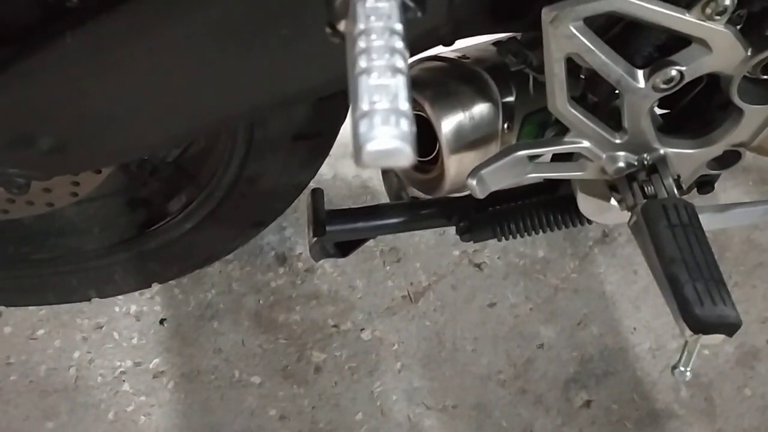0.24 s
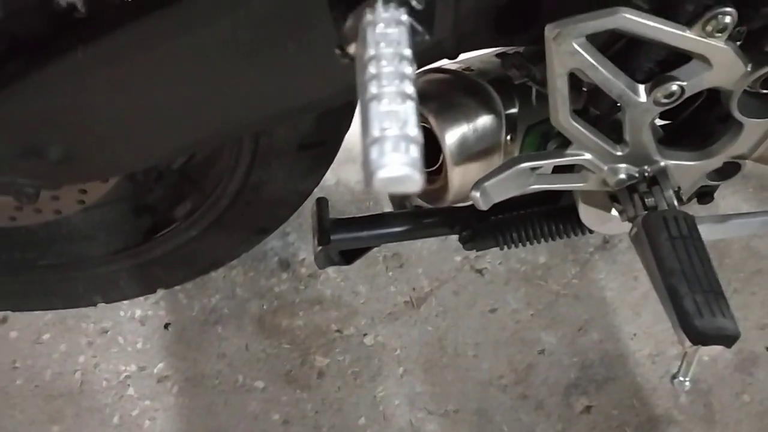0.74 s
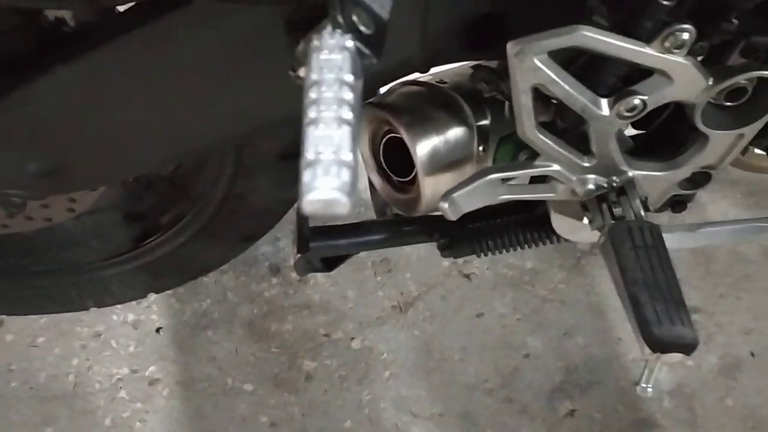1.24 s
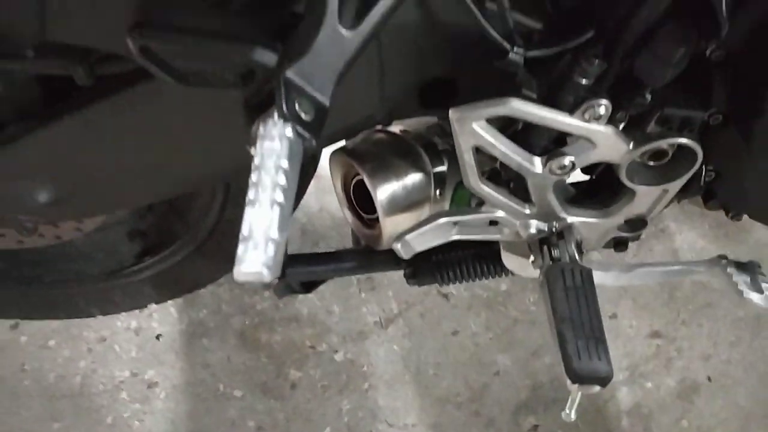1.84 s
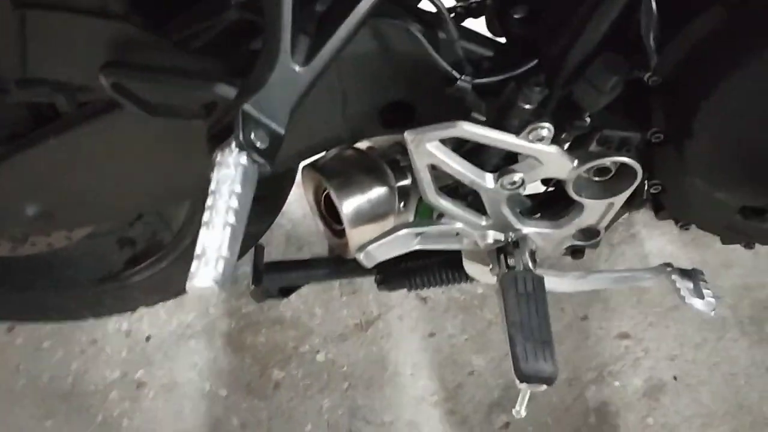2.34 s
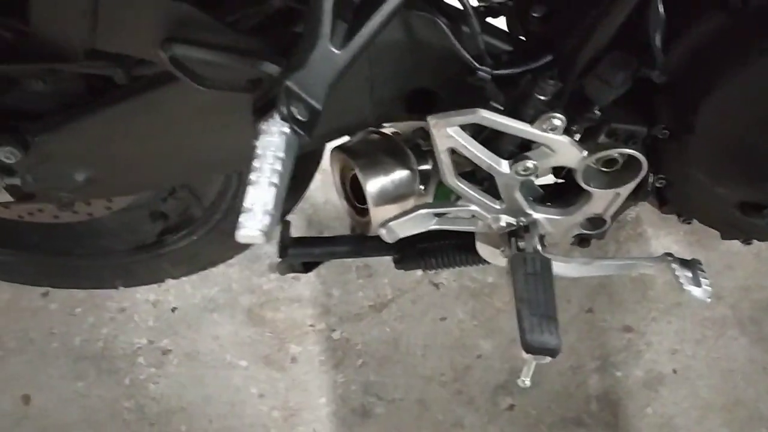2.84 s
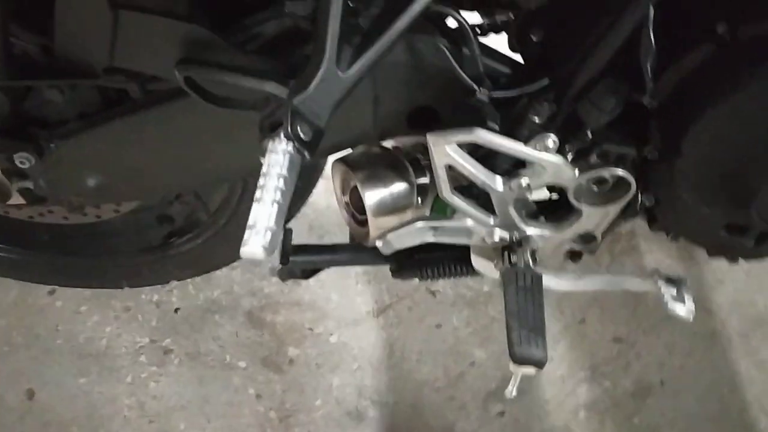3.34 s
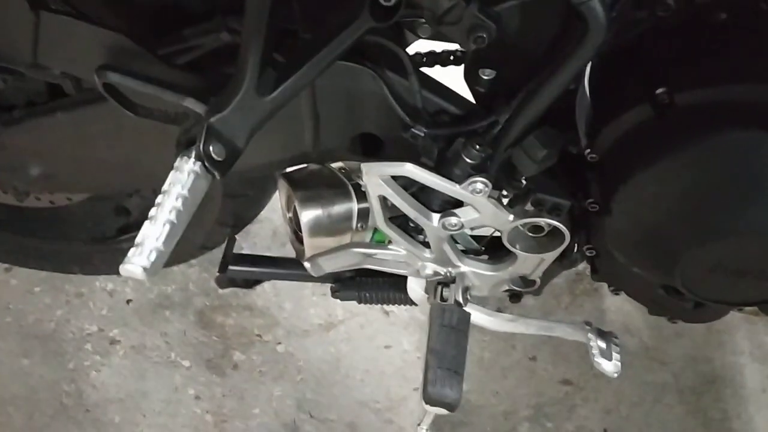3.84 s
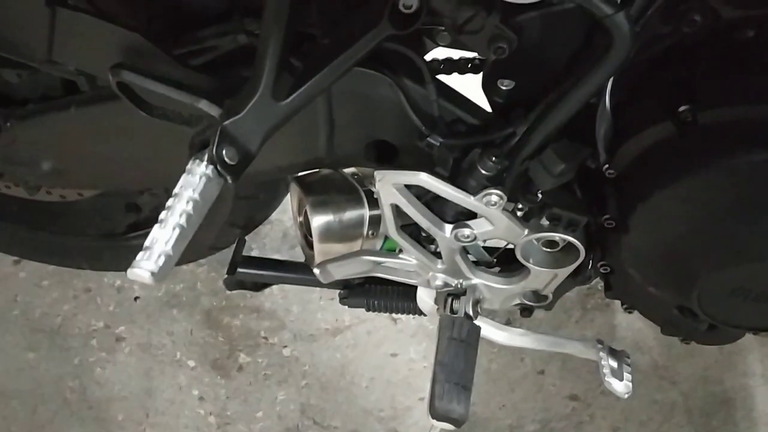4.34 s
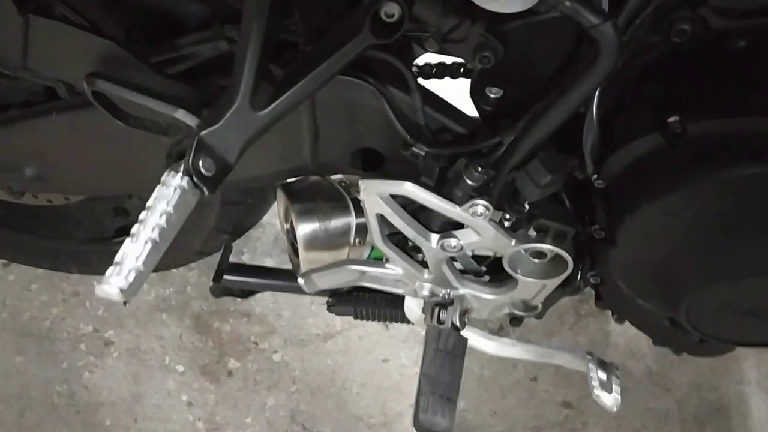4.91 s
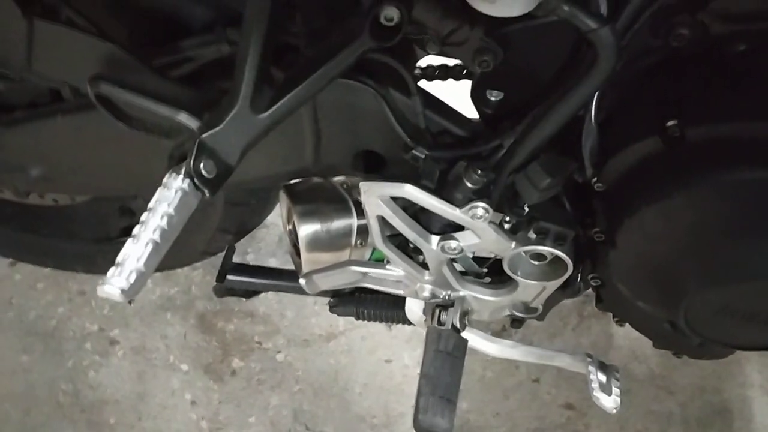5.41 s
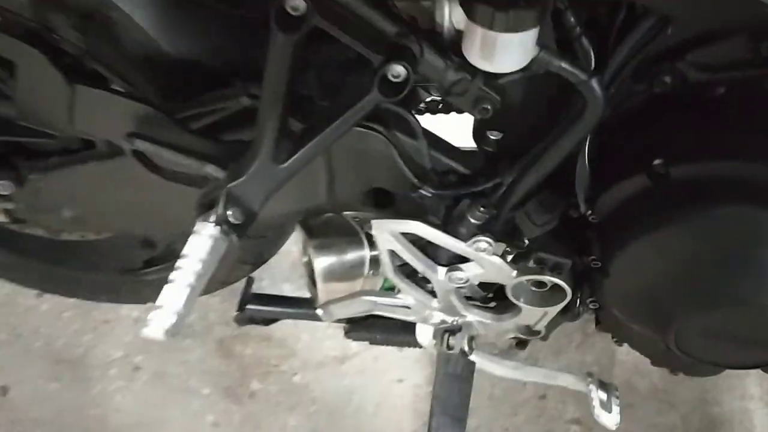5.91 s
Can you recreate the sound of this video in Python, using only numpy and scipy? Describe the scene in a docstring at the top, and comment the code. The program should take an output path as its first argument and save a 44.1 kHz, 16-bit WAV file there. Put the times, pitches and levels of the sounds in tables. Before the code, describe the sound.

A three-cylinder motorcycle with an open exhaust is heard close up on a hand-held phone in a concrete garage with a slight echo. At the start the engine is already falling from high revs, popping. At about 0.4 seconds a quick throttle blip cracks and barks, peaking near 0.6 seconds. The revs sink with burbling and sharp pops, a strong one at 1.2 seconds. From about 1.4 seconds it idles with a deep, booming, slightly uneven beat, pulsing gas hiss, ticking valves and a light gear whine, with an occasional softer firing. At about 5.2 seconds it is switched off: a thin, very high squeak, a few last weak beats and a clunk near 5.5 seconds. A few faint ticks of hot metal follow in the quiet room until about 6 seconds.

```python
"""A three-cylinder motorcycle with an open silencer slows from one throttle blip and takes a second.
Its exhaust cracks and booms, gas roars and hisses, unburnt fuel pops, valves tick and gears whine.
It settles to idle with a few soft firings and is switched off: a seal squeaks, hot metal ticks and
the crank rocks to rest with a clunk. All this is heard close to a hand-held phone in a concrete garage."""
import sys
import numpy as np
from scipy import signal
from scipy.fft import rfft, irfft, next_fast_len
from scipy.io import wavfile
from scipy.ndimage import uniform_filter1d, map_coordinates

SR = 44100
rng = np.random.default_rng(int(sys.argv[2]) if len(sys.argv) > 2 else 0)


def unload_wav(signal):
    """Save mono or channel-first audio to the path in sys.argv[1] as 16-bit WAV at rate SR, clipped to [-1, 1]."""
    wavfile.write(
        sys.argv[1],
        SR,
        np.round(np.clip(np.atleast_2d(signal).T, -1, 1) * 32767).astype(np.int16),
    )


N = 272097

# Engine speed, a little unsteady at idle: (time [s], exhaust strokes of all cylinders [1/s])
ENGINE_SPEED = [(0, 95.12), (.44, 49.1), (.47, 69.7), (.506, 92.6), (.55, 104.5), (.57, 105), (.65, 94),
                (.95, 64.56), (1.13, 45.2), (1.25, 35.57), (1.35, 29.26), (1.525, 27.48), (1.595, 29.82),
                (1.735, 31.3), (1.805, 29.59), (1.91, 30.09), (1.98, 27.48), (2.05, 29.77), (2.19, 28.02),
                (2.26, 29.03), (2.365, 28.82), (2.435, 31.05), (2.575, 29.58), (2.645, 30.34),
                (2.89, 28.19), (2.995, 30.22), (3.13, 29.4), (3.275, 30.45), (3.45, 28.08), (3.555, 29.31),
                (3.87, 28.39), (3.94, 30.2), (4.01, 29.24), (4.43, 30), (4.535, 28.79), (4.605, 30.08),
                (4.885, 29.87), (4.955, 31.06), (5.095, 27.34), (5.2, 28.65), (5.265, 18.6), (5.47, 18)]


def amp(db):
    return 10 ** (np.asarray(db) / 20)


def unit(x):
    return x / np.sqrt(np.mean(x ** 2) + 1e-20)


def along(points, hz):
    """Read between (frequency, value) points on a log frequency axis."""
    f, v = np.transpose(points)
    return np.interp(np.log(hz + 1), np.log(f + 1), v)


def curve(points):
    """Join (time, value) points with straight lines, one value a sample."""
    return np.interp(np.arange(N) / SR, *np.transpose(points))


def wobble(rate):
    """A smooth curve through rate random values a second."""
    return map_coordinates(rng.standard_normal(int(N * rate / SR) + 4), [np.arange(N) * rate / SR])


def filtered(x, response):
    """Multiply each frequency in x by response(hz)."""
    m = next_fast_len(N + SR // 2)
    return irfft(rfft(x, m) * response(np.fft.rfftfreq(m, 1 / SR)), m)[..., :N]


def rush(spectrum, pulsing=1):
    """Stereo noise of average strength 1, more alike left and right in the bass than in the treble."""
    # How alike the two sides are: (frequency [Hz], likeness [0 to 1])
    likeness = [(60, 0.92), (250, 0.92), (600, 0.7), (1400, 0.074), (14000, 0.2)]
    # How much louder the left side is: (frequency [Hz], level [dB])
    balance = [(500, 2), (1200, -5), (2300, 2.5), (4000, 2.5), (8000, -3.5), (13000, 3.5)]
    angle = lambda hz: np.arccos(along(likeness, hz)) / 2
    shape = lambda hz: amp(along(spectrum, hz)) * [np.cos(angle(hz)), np.sin(angle(hz))]
    mid, side = filtered(pulsing * rng.standard_normal((2, N)), shape)
    left_lead_s, halves = .00006, np.array([[.5], [-.5]])
    place = lambda hz: (amp(along(balance, hz)) * np.exp(2j * np.pi * hz * left_lead_s)) ** halves
    return unit(filtered(np.array([mid + side, mid - side]), place))


def ringing(blows, tones):
    """Each blow starts tones that wait for their delay, swell and die away."""
    t = np.arange(-SR // 100, SR // 6) / SR
    ring = 0
    for hz, db, delay, swell in tones:
        age = np.maximum(t - delay, 0)
        ring += amp(db + 8.5) * age / swell * np.exp(-age / swell) * np.sin(2 * np.pi * hz * age)
    return signal.fftconvolve(blows, ring)[SR // 100:][:N]


def bursts(events, fade_s):
    """Short bursts of noise, each in one broad band, falling 60 dB in fade_s."""
    out, t = np.zeros(N + SR), np.arange(SR // 8) / SR
    f = np.fft.rfftfreq(len(t), 1 / SR)
    attack = 1 - np.exp(-t / .00059)
    for s, db, hz, wide_hz in events:
        band = abs(f * wide_hz / (hz * hz - f * f + 1j * f * wide_hz)) ** 2
        noise = irfft(rfft(rng.standard_normal(len(t))) * band, len(t))
        out[round(s * SR):][:len(t)] += amp(db - 2.5 - 60 * t / fade_s) * attack * unit(noise)
    return out[:N]


def strokes():
    """The crank's position, counted in strokes, and the samples at which an exhaust valve opens."""
    running = np.arange(N) < ENGINE_SPEED[-1][0] * SR
    crank = np.cumsum(curve(ENGINE_SPEED) * running) / SR - .5
    return crank, np.flatnonzero(np.diff(np.floor(crank), prepend=-1))


def throttle(rise_s=.048, fall_s=.24):
    """The second blip: rises from 0, holds at 1 while the throttle is open, then falls."""
    open_s, shut_s = .45, .56
    return curve([(open_s - rise_s, 0), (open_s, 1), (shut_s, 1), (shut_s + fall_s, 0)])


def idle_time(middle_s=3.16):
    """Seconds from the middle of the idle, zero at other speeds."""
    at_idle = abs(curve(ENGINE_SPEED) - 29) < 3
    return uniform_filter1d((np.arange(N) / SR - middle_s) * at_idle, SR // 20)


def coasting(off_s=5.316, fade_s=.94):
    """A gain that falls once the ignition is off."""
    return amp(-60 * np.maximum(np.arange(N) / SR - off_s, 0) / fade_s)


def levels():
    """Push, crack, boom, roar and hiss in dB, following the speed and the throttle."""
    # Loudness at each speed: (speed [strokes/s], push [dB], crack [dB], boom [dB], roar [dB], hiss [dB])
    by_speed = [(18.5, -28, -38, -13.5, -29.5, -37.5), (24, -34, -21, -11, -25.5, -25),
                (27.2, -19, -10, -8, -24, -28.5), (30.9, -19, -11, -8, -24.5, -28.5),
                (33.5, -28, -25, -13, -25, -25.5), (49, -25, -22, -11.5, -19.5, -19),
                (62.5, -14, -19.5, -14.5, -21.5, -19.5), (79.7, -9.5, -13.5, -21.5, -19, -18.5),
                (100, -9.5, -20, -14, -20, -20.5)]
    # Drift at idle as the phone draws back: (push, crack, boom, roar, hiss [all dB/s])
    idle_drift = (.1, -2.7, .5, 0, 0.18)
    # Change in the blip, as a full charge burns evenly: (push, crack, boom, roar, hiss [all dB])
    blip_change = (0.7, -4, -17, -0.5, -1.5)
    speeds, *columns = np.transpose(by_speed)
    return np.array([np.interp(curve(ENGINE_SPEED), speeds, db) + drift * idle_time() + change * throttle()
                     for db, drift, change in zip(columns, idle_drift, blip_change)])


def exhaust(at):
    """Every stroke pushes gas out; a burnt charge cracks at the outlet, then the silencer booms."""
    # Firings that stand out from the even beat: (time [s], crack change [dB], boom change [dB])
    odd_firings = [(.44, 18, -3), (.8, 9.5, -1), (1.2, 17, 5), (1.227, -13.5, -6), (1.254, -19.5, -2.5),
                   (1.347, 2, -1), (1.452, -18, .2), (1.822, -14, -1.2), (1.958, -10, -1), (2.54, -22, 0),
                   (3.8, -9, -1), (4.18, -10, 0), (4.513, -33, -11.5), (4.648, 4, -2.5), (4.753, -8, -1),
                   (5.053, -8, -2), (5.084, -6, -1), (5.155, -13, 0), (5.191, 3, -0.5), (5.228, -15, -3),
                   (5.278, -6, 1), (5.332, -6, -1.5), (5.387, -10, -15), (5.442, -10, -7.5)]
    # How push, outlet, pipe and silencer chamber ring: (pitch [Hz], level [dB], delay [s], swell [s])
    push_tones = [(132, 2.5, -.0018, 0.00066), (206, -12.5, -.0012, 0.0035), (410, -12.5, 0.001, 0.0042),
                  (559, -12, 0.001, 0.003)]
    outlet_tones = [(323, -9, -.0011, 0.0022)]
    pipe_tones = [(227, -7, -.0013, 0.0027)]
    chamber_tones = [(146.35, 2, .0104, 0.0075), (175.5, -1, -.0016, 0.0035), (97, 0.5, -0.00162, 0.0044),
                     (105.5, 1, .0135, 0.0021), (59.3, -9.5, 0.0008, 0.012)]
    load_db, pipe_db_per_s, pitch_step = 8.5, 3, .02
    push_luck, crack_luck, boom_luck, timing_luck = rng.standard_normal((len(at), 4)).T
    odd_db = np.zeros((len(at), 2))
    for s, *db in odd_firings:
        odd_db[np.argmin(abs(at - s * SR))] = db
    speed = SR / np.gradient(at)
    uneven = np.clip((95 - speed) / 20, 0, 1) * (speed > 36)  # a shut throttle above idle burns unevenly
    # Burning never peaks at quite the same crank angle.
    at = at + np.round(timing_luck * (.011 + .025 * uneven) * SR / speed).astype(int)
    push_db, crack_db, boom_db = levels()[:3, at]
    crack_db += load_db * throttle(.03, .03)[at]  # an open throttle cracks harder
    push, crack, boom, warmth = np.zeros((4, N))
    push[at] = amp(push_db + (1 + 2 * uneven) * push_luck)
    crack[at] = amp(crack_db + odd_db[:, 0] + 1.8 * crack_luck + 1.7 * wobble(5)[at])
    boom[at] = amp(boom_db + odd_db[:, 1] + .73 * boom_luck + .55 * wobble(6)[at])
    warmth[at] = rng.integers(-1, 2, len(at))  # cooler or hotter gas shifts the chamber's pitch
    chamber = 0
    for step in (-1, 0, 1):
        shifted = [(hz * (1 + pitch_step * step), *rest) for hz, *rest in chamber_tones]
        chamber += ringing(boom * (warmth == step), shifted)
    pipe = ringing(crack * amp(pipe_db_per_s * idle_time()), pipe_tones)
    return ringing(push, push_tones) + ringing(crack, outlet_tones) + pipe + chamber


def burble():
    """Above idle with the throttle shut, stray fuel burns between strokes: thumps, each with a rasp."""
    # The ring of one thump: (pitch [Hz], level [dB], delay [s], swell [s])
    thump_tones = [(179.8, 0.5, 0.0018, 0.0086), (300, -2.5, 0.00077, 0.003)]
    burns_per_s, rasp_hz, rasp_wide_hz = 70, 1310, 1770
    gap, size, sign = rng.random((3, 600))
    times = np.cumsum(.4 + 1.2 * gap) / burns_per_s
    at = (times[times < N / SR] * SR).astype(int)
    slowing = np.clip((curve(ENGINE_SPEED) - 33) / 6, 0, 1) * (1 - throttle())
    gain = slowing[at] * amp(11.8 * (size[:len(at)] - .5))
    thumps = np.zeros(N)
    thumps[at] = amp(-21) * gain * np.sign(sign[:len(at)] - .5)
    rasps = [(i / SR, -19 + 20 * np.log10(g), rasp_hz, rasp_wide_hz) for i, g in zip(at, gain) if g > 0]
    return ringing(thumps, thump_tones) + bursts(rasps, fade_s=.027)


def puffs(crank, lag, sharp, depth_db, scatter_db, flutter_db=0):
    """A gain with one puff of random size a stroke, lag strokes after the valve opens."""
    turn = crank - lag
    luck = rng.standard_normal(int(crank[-1]) + 4)[np.round(turn).astype(int) + 1]
    peak = np.exp(sharp * (np.cos(2 * np.pi * turn) - 1))
    gain = amp((depth_db + scatter_db * luck) * peak + flutter_db)
    return gain / np.sqrt(abs(uniform_filter1d(gain ** 2, SR // 8)))  # keep the average strength even


def gas(crank):
    """Swirling gas roars and hisses in time with the strokes; the roar pulses harder at speed."""
    # The tone of the roar and of the hiss: (frequency [Hz], level [dB])
    roar_tone = [(260, -14), (450, -7), (700, -8), (818, -4), (1000, -4.5), (1170, -5), (1820, -3),
                 (2360, -8), (2780, -7), (3210, -11), (4500, -12), (5850, -17.5), (9900, -120)]
    hiss_tone = [(2060, -18), (3500, -17), (3810, -9), (4120, -13), (6230, -5), (9040, 4.5), (10900, -2),
                 (13300, -17.5), (14700, -33)]
    roar_db, hiss_db = levels()[3:]
    roar = puffs(crank, lag=.053, sharp=7, depth_db=.075 * curve(ENGINE_SPEED), scatter_db=1,
                 flutter_db=1.62 * wobble(140))
    hiss = puffs(crank, lag=.011, sharp=6.1, depth_db=5, scatter_db=1.9,
                 flutter_db=1.6 * wobble(120) + .9 * wobble(4))
    return coasting() * (amp(roar_db) * rush(roar_tone, roar) + amp(hiss_db) * rush(hiss_tone, hiss))


def valves(at):
    """A valve shuts once a stroke and rings the cylinder head; softer against the roar at speed."""
    # The head's ring: (pitch [Hz], level [dB], delay [s], swell [s])
    head_tones = [(1640, 2.5, .003, .002), (1260, -2, .0045, .0025)]
    ticks, gap = np.zeros((2, N)), np.gradient(at)
    hardness = amp(3.3 * rng.standard_normal((len(at), 2)).T)
    softening = np.clip(gap / np.median(gap), 0, 1) ** .51
    roar_db = levels()[3, at]
    ticks[:, at] = amp(roar_db) * coasting()[at] * hardness * softening
    return np.array([ringing(side, head_tones) for side in ticks]) * [[.5], [1]]


def garage(x):
    """The echo of the concrete walls: each frequency dies away at its own speed."""
    # How long the echo lasts: (frequency [Hz], time to fall 60 dB [s])
    echo_times = [(60, 0.94), (146, 0.48), (300, 0.97), (900, 0.85), (2000, 0.57), (4000, 0.34),
                  (9000, 0.32)]
    hz, t, noise = signal.stft(rng.standard_normal((2, SR * 3 // 4)), SR, nperseg=256)
    tail = signal.istft(noise * amp(-60 * t / along(echo_times, hz)[:, None]), SR, nperseg=256)[1]
    echo = signal.fftconvolve(np.atleast_2d(x), tail / np.linalg.norm(tail[0]), axes=1)[:, :N]
    middle = echo.mean(0)  # long waves reach both sides alike
    return middle + filtered(echo - middle, lambda hz: hz ** 2 / (hz ** 2 + 180 ** 2))


def room_air():
    """The faint, steady rush of the room."""
    # Its tone: (frequency [Hz], level [dB])
    air_tone = [(18, -33), (30, 6), (170, -8), (309, -13), (1950, -17), (5490, -25.5), (8990, -12),
                (14700, -30)]
    return amp(-51) * rush(air_tone)


def pops():
    """Unburnt fuel lights in the pipe."""
    # Each pop: (time [s], level [dB], centre [Hz], width [Hz])
    fuel_pops = [(.082, -11.5, 1600, 800), (.147, -13, 500, 1000), (.205, -8, 900, 1500),
                 (.235, -12, 1000, 1500), (.27, -14, 1260, 800), (.793, -12, 500, 1500),
                 (.88, -9, 700, 2000), (1.001, -15, 1150, 800), (1.083, -13.5, 1600, 800),
                 (1.199, -7.5, 400, 700), (1.227, -13.5, 1680, 800), (1.28, -14, 8100, 5000)]
    return bursts(fuel_pops, fade_s=.048)


def gears(crank):
    """Meshing teeth whine in rough chirps near idle speed, and fall silent while the engine revs up."""
    # The whine's tones: (tooth contacts [per stroke], level [dB])
    whine_tones = [(27.7, -39.5), (61.5, -35.5), (93.5, -46.5)]
    # A cover boosts one band: (centre [Hz], width [Hz], boost [dB])
    cover_band = (2595, 390, 9)
    cover_hz, wide_hz, boost_db = cover_band
    speed, whine = np.gradient(crank) * SR, 0
    for teeth, db in whine_tones:
        hz = teeth * speed
        cover_db = boost_db * np.exp(-((hz - cover_hz) / wide_hz) ** 2)
        cover_db -= np.maximum(hz - 3100, 0) / 40  # it also blocks the treble
        gain = amp(db + cover_db + 3.6 * wobble(45))
        whine += gain * np.sin(2 * np.pi * teeth * crank + 1.9 * wobble(190))
    near_idle = np.clip(speed / 28, 0, 1) ** 4 * np.clip((60 - speed) / 8, 0, 1)
    unloaded = np.gradient(curve(ENGINE_SPEED)) * SR < 100
    return whine * near_idle * unloaded * amp([[-2], [2]])


def intake_bark(crank):
    """Air swirls into the intake in gulps, loud while the throttle is open."""
    # The tone of the air box: (frequency [Hz], level [dB])
    airbox_tone = [(200, -56.5), (500, -3), (1000, 3), (1600, 0), (3000, -26)]
    gulps = puffs(crank, lag=.23, sharp=3.5, depth_db=9.5, scatter_db=-2)
    bark_db = -17.5 - 45 * (1 - throttle(rise_s=.05, fall_s=.086))
    return coasting() * amp(bark_db) * rush(airbox_tone, gulps)


def squeaks(pitch_hz=10640):
    """A seal rubs with a thin, high tone as the engine stops."""
    # Each rub: (time [s], length [s], level [dB])
    rubs = [(5.224, 0.027, -23), (5.345, .055, -48), (5.447, 0.012, -33), (5.526, 0.019, -49)]
    t, gain = np.arange(N) / SR, 0
    for s, length, db in rubs:
        progress = np.clip((t - s) / length, 0, 1)
        gain += amp(db) * np.sin(np.pi * progress) ** .4 * (t < s + length)
    return gain * np.sin(2 * np.pi * pitch_hz * t)


def metal_ticks():
    """The stopping engine knocks and its hot metal ticks."""
    # Each knock or tick: (time [s], level [dB], centre [Hz], width [Hz])
    ticks = [(5.225, -22, 9000, 5000), (5.268, -26, 8500, 5000), (5.323, -27, 9000, 6000),
             (5.37, -31, 2500, 3000), (5.41, -25.5, 9000, 9140), (5.46, -19, 1800, 6000),
             (5.478, -19, 250, 1100), (5.642, -37, 1690, 1500), (5.757, -37, 10400, 2500),
             (5.847, -42, 9200, 2000), (5.932, -43, 900, 1100), (6.099, -49, 1470, 800)]
    return bursts(ticks, fade_s=.034)


def clunk(time_s=5.462):
    """The crank rocks back against squeezed gas and rings its case."""
    # The case's ring: (pitch [Hz], level [dB], delay [s], swell [s])
    case_tones = [(264, -30, .008, .005), (721, -35, .003, .004), (1217, -30, .002, .004)]
    return ringing(signal.unit_impulse(N, round(time_s * SR)), case_tones)


def scene():
    """Add up all the sounds; only the tailpipe and the metal ticks echo off the walls."""
    crank, at = strokes()
    tailpipe = exhaust(at) + burble() + pops()
    metal = metal_ticks()
    echo = garage(amp(-14.5) * tailpipe + amp(-1.5) * metal)
    engine = tailpipe + gas(crank) + valves(at) + gears(crank) + intake_bark(crank)
    return engine + squeaks() + metal + clunk() + echo + room_air()


def record(dry):
    """The phone drops the deepest bass, rounds off loud peaks and cuts the highest treble."""
    bass_hz, top_hz = 40, 14600
    x = filtered(dry, lambda hz: 1 / np.sqrt(1 + (bass_hz / (hz + 1)) ** 5))
    x = x / (1 + abs(x) ** 8) ** (1 / 8)
    return filtered(x, lambda hz: hz < top_hz)


dry = scene()
out = record(dry)
unload_wav(out)
```